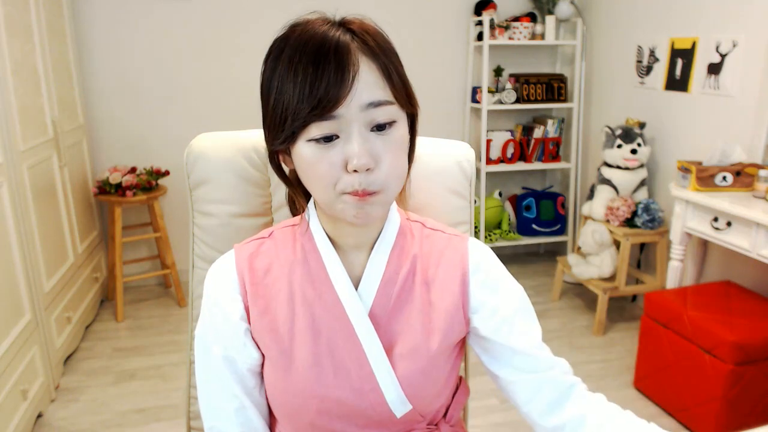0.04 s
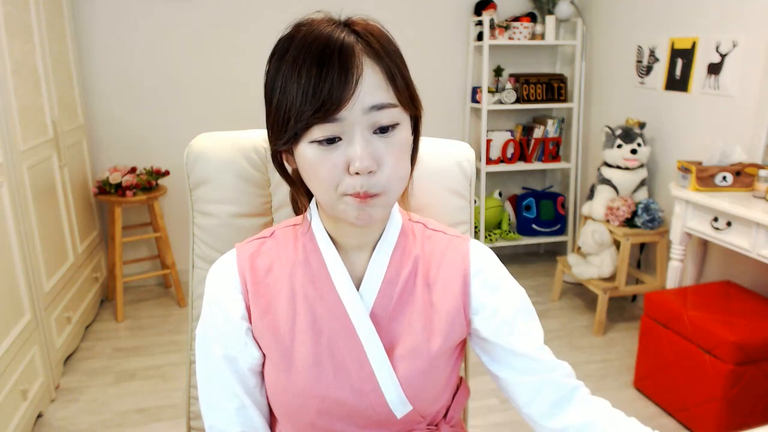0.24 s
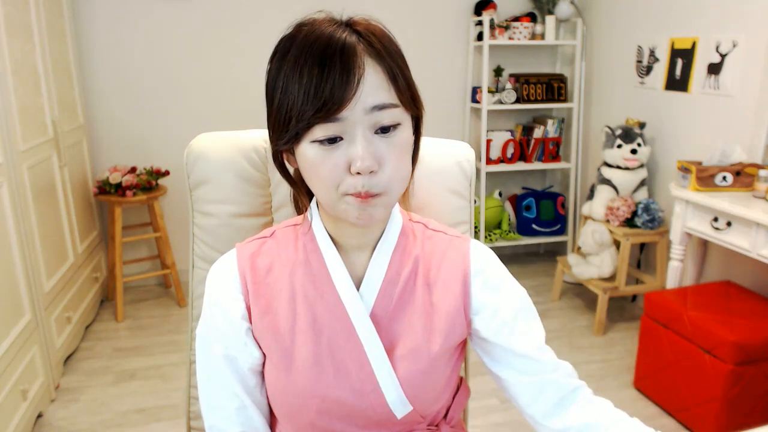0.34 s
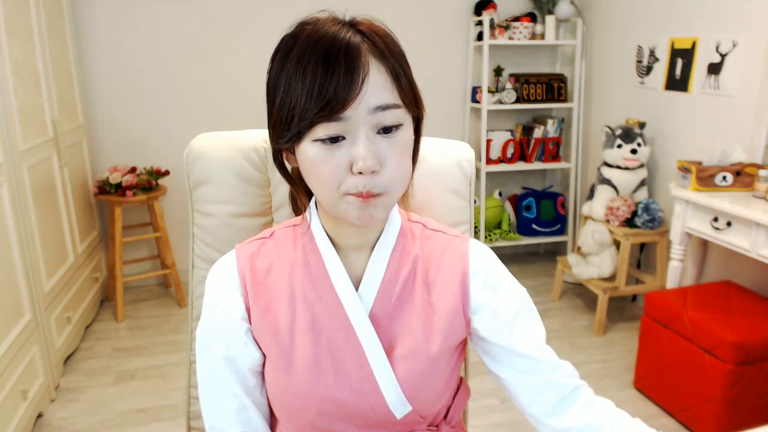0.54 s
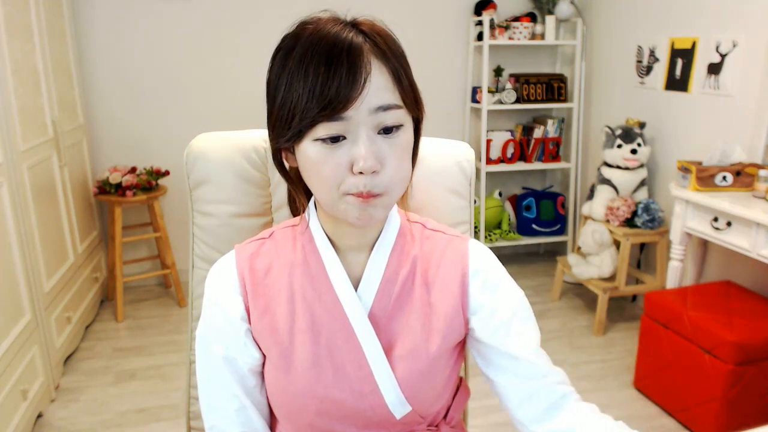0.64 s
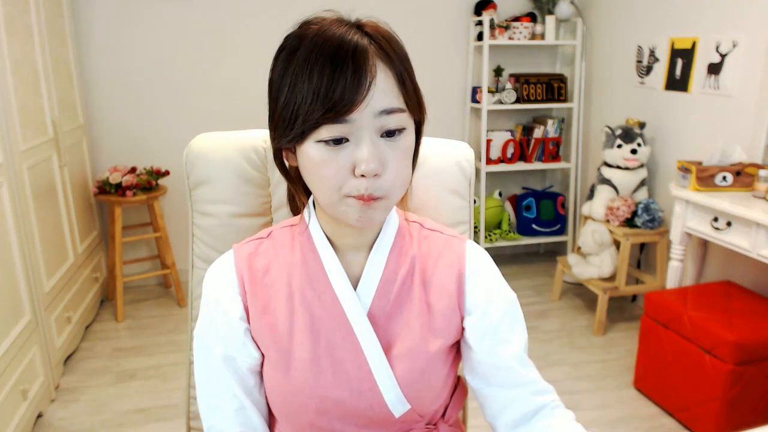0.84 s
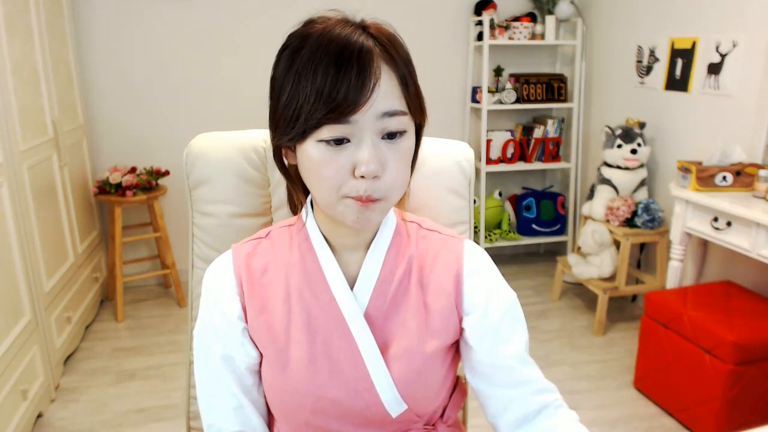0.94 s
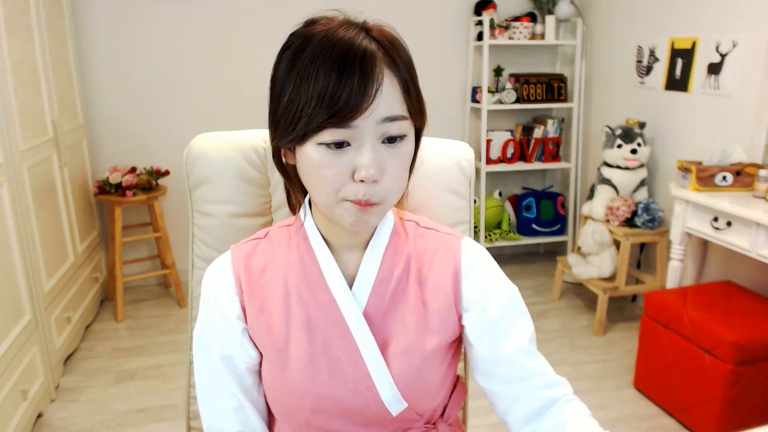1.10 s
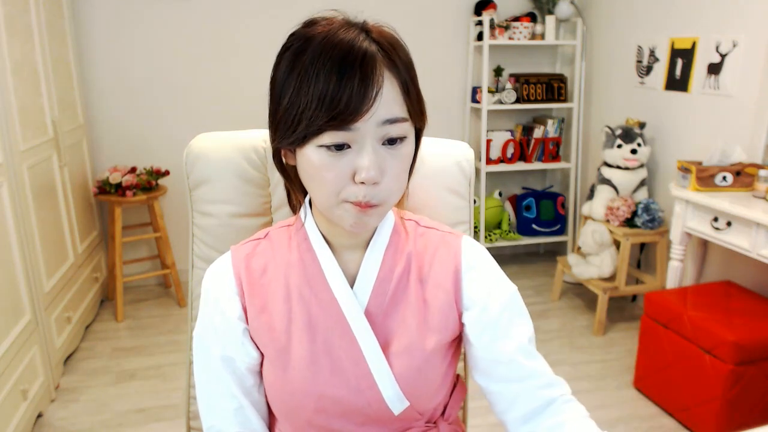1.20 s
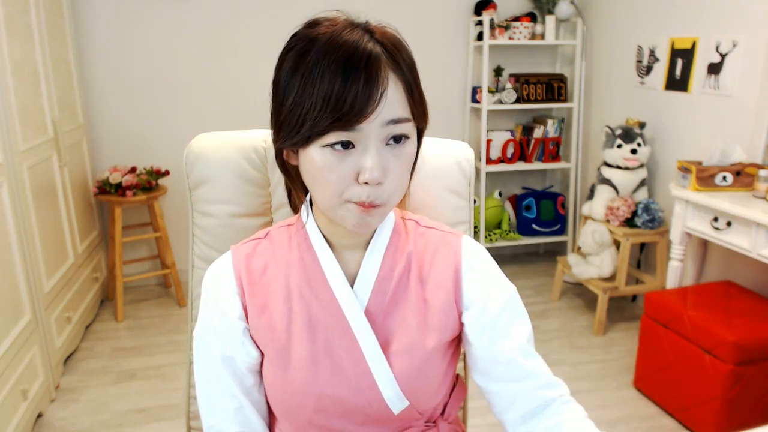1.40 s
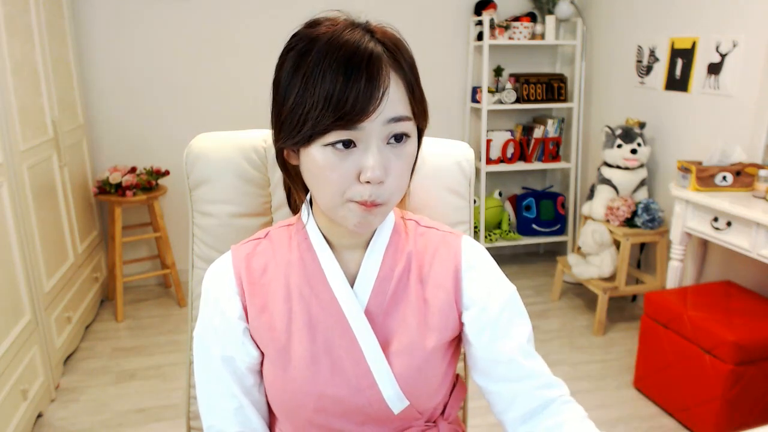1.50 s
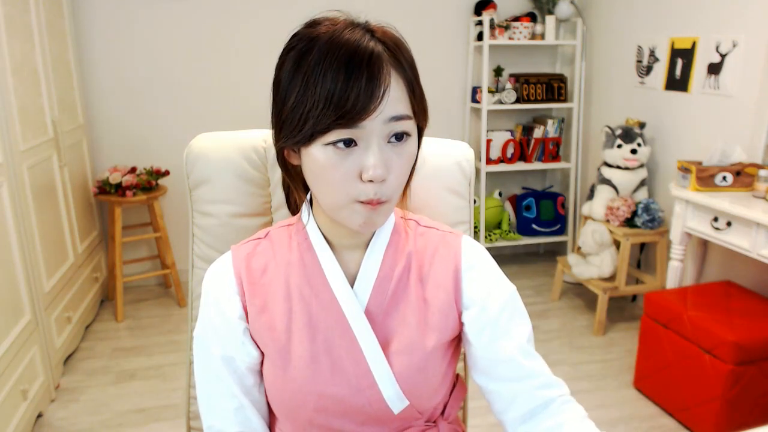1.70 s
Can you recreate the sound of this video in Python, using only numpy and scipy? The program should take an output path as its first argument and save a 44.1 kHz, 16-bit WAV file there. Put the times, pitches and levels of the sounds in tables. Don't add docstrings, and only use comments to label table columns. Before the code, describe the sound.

Close, desk-mounted microphone: a mug is set down twice in quick succession, woody thuds with short rings and low desk heave, then a gentle tap, leaving steady fan hum, soft hiss and very faint sleeve rustle.

```python
import sys
import numpy as np
from scipy import signal
from scipy.fft import rfft, irfft
from scipy.io import wavfile

SR = 44100
rng = np.random.default_rng(int(sys.argv[2]) if len(sys.argv) > 2 else 0)


def boost(x):
    u = np.asarray(x, float) / 20
    return 10 ** u


def wav_out(sig):
    wavfile.write(sys.argv[1], SR, np.round(np.clip(np.atleast_2d(sig).T, -1, 1) * 32767).astype(np.int16))


N = 77175
T = np.arange(N) / SR

# frequency in Hz, width in Hz, level in dB rms.
HUM = [(49.5, 4, -45.5), (93, 1.8, -67), (129.4, 6.3, -52.5), (151.8, 3.5, -48.5), (179.3, 4.2, -52),
       (201.5, 24, -60), (341, 8.1, -62), (581, 10, -71), (915, 13, -71), (1815, 234, -67.5)]
# frequency in Hz, level in dB.
AIR_COLOUR = [(20, -4), (60, -14.5), (90, -12.5), (180, -17), (300, -17), (700, -25.5), (2200, -35),
              (3500, -38)]
# start in seconds, length in seconds, frequency in Hz, level in dB.
SQUEAKS = [
    (.178, .036, 6330, -68),
    (.242, .012, 6330, -65),
    (.515, .025, 9050, -72),
]
# start in seconds, level in dB, contact time in ms,
# signed side of the rocking base (-1 to +1).
FIRST_CONTACTS = [
    (.2166, -31, 0.17, 1),
    (.2173, -11.5, 0.58, 1),
    (.2181, -2, 1.09, -1),
    (.2295, -25, 0.27, -0.17),
    (.2328, -18, 1.2, -1),
    (.2450, -26, 0.35, 1),
    (.2580, -44, 1.5, -1),
    (.2875, -39, 0.48, -1),
    (.343, -29, 2.2, 1),
]
SECOND_CONTACTS = [
    (.4502, -43, 0.14, 0.48),
    (.4518, -23.5, .7, -0.7),
    (.4553, -11.5, 0.46, 0.89),
    (.4605, -29.5, 0.79, 0.61),
    (.4650, -23, .8, -1.05),
    (.4725, -40, 0.36, 0.24),
]
SETTLE_CONTACTS = [
    (.5860, -34, 0.83, 0.47),
    (.5960, -27, 1.26, 0.85),
]
# start in seconds, level in dB, contact time in ms, signed side.
WEIGHT = [
    (.2190, -14, 0.7, -1.62),
    (.4560, -20.5, 1.5, -1.05),
    (.5900, -38.5, 1.7, -1),
]
# frequency in Hz, level in dB, T60 in seconds.
FIRST_MODES = [(288, -11, 0.24), (476, 3.5, 0.05), (500, -3.5, 0.066), (603, -1, 0.13), (629.5, 3.5, 0.2),
               (646, -8.5, .08), (900, -13.5, 0.39), (990, 2.5, 0.071), (1170, -2, 0.081),
               (1290, -11, 0.12)]
SECOND_MODES = [(260, -18, 0.14), (411, 6, 0.12), (582, 9.5, .13), (643, -3.5, .3), (860, -8, 0.2),
                (1103, -15.5, 0.27), (1260, -10, .22), (1455, -13, .2), (1810, -15, .2), (2260, -5.5, .22)]
SETTLE_MODES = [(260, 10.5, 0.21), (599, 4.5, 0.23), (710, 13, 0.076)]
# frequency in Hz, level in dB, T60 in seconds.
THUD = [(366, 14, 0.031), (885, 2, 0.051)]
# frequency in Hz, level in dB, T60 in seconds.
HEAVE = [
    [(35.8, -15, 0.49), (54.8, -5.5, 0.24), (68.2, -2, 0.21), (81.4, -10, 0.1)],
    [(40.6, -3.5, 0.48), (54.6, 4.5, 0.27), (72.3, -4, 0.18), (84, -12, 0.077)],
    [(35, -22, .25), (62, 6.5, 0.41)],
]
# frequency in Hz, density in dB per Hz.
FIRST_TAIL = [(100, -2.5), (400, -14.5), (900, -17), (1500, -23.5), (2400, -33.5), (3500, -43),
              (7000, -46.5), (12000, -59)]
SECOND_TAIL = [(100, -2), (400, -8), (900, -23), (1500, -22), (2500, -31), (3100, -40), (5000, -50),
               (12000, -61)]
# frequency in Hz, T60 in seconds.
TAIL_T60 = [(100, 0.25), (500, 0.34), (2000, .28), (5000, 0.16), (12000, 0.049)]
# frequency in Hz, density in dB per Hz.
CRACK = [(500, -18), (1500, -13), (2600, -6.5), (4000, -17), (8000, -58), (14000, -56)]
# frequency in Hz, level in dB, T60 in seconds.
CLACK = [
    [(1340, 2, 0.021), (1750, -22, 0.09), (2330, 10, 0.018), (3080, -38, .06), (4900, -19, 0.15),
     (7040, -28, 0.056)],
    [(1580, 2, 0.049), (1795, 4.5, 0.022), (2180, -14, 0.044), (3350, -34, .06), (3970, -15, 0.07),
     (4720, -13.5, .05)],
    [(1110, -8, .03)],
]
RING_DB = [-12.5, -15.5, -14]
TAIL_DB = [-16.5, -11, -16]
CRACK_DB = [-29, -38, -42]
CLACK_DB = [-23, -23, -26]
# start in seconds, frequency in Hz, peak level in dB, T60 in seconds.
PANEL_NOTES = [
    (.2200, 351, -25, .37),
    (.2200, 727, -33, .24),
    (.2200, 148, -24, .16),
    (.4560, 350, -31, .6),
    (.4560, 163, -30, .25),
]
# centre in seconds, length in seconds, frequency in Hz, level in dB.
SWAY = [
    (1.11, 0.33, 87, -49),
    (0.555, .1, 56, -33),
]
# centre in seconds, length in seconds, centre frequency in Hz, level in dB.
RUSTLES = [
    (1.178, .045, 1800, -65),
    (1.175, .04, 5000, -66),
    (.99, .07, 4000, -72),
]

RESPONSE_T = T[:SR // 2]


def curve(table, hz):
    table = np.array(table, float)
    return np.interp(np.log(np.maximum(hz, 1)), np.log(table[:, 0]), table[:, 1])


def unit(x):
    return x / np.sqrt(np.mean(x ** 2))


def band(hz, width_hz, size=N):
    f = np.fft.rfftfreq(size, 1 / SR)
    spectrum = rfft(rng.standard_normal(size))
    return unit(irfft(spectrum * np.exp(-.5 * ((f - hz) / width_hz) ** 2), size))


def bell(centre, length):
    return np.exp(-.5 * ((T - centre) / (length / 2)) ** 2)


def push(contacts):
    force = 0
    for start, db, ms, side in contacts:
        pulse = np.exp(-.5 * ((T - start - ms / 1e3) / (ms / 4460.0)) ** 2)
        force = force + side * boost(db) * pulse / (ms * SR / 1e3)
    return force


def rings(modes):
    t = RESPONSE_T
    return sum(boost(db) * np.sin(2 * np.pi * hz * t) * 1000. ** (-t / min(t60, .7)) for hz, db, t60 in modes)


def hear(force, response):
    return signal.fftconvolve(force, response)[:N]


def room():
    steady_share, air_db = .5, -50.5
    hum = 0
    for hz, width_hz, db in HUM:
        share = steady_share * (width_hz < 7)
        tone = np.sqrt(2 * share) * np.sin(2 * np.pi * (hz * T + rng.random()))
        hum = hum + boost(db) * (tone + np.sqrt(1 - share) * band(hz, width_hz))
    f = np.fft.rfftfreq(N, 1 / SR)
    gain = boost(curve(AIR_COLOUR, f)) * (f > 15) / (1 + (f / 5000) ** 2)
    return hum + boost(air_db) * unit(irfft(rfft(rng.standard_normal(N)) * gain, N))


def glaze_squeaks():
    return sum(boost(db) * bell(start + length / 2, length) * np.sin(2 * np.pi * hz * T)
               for start, length, hz, db in SQUEAKS)


def dense_tail(colour, bands):
    t, rise_s = RESPONSE_T, 0.001
    decaying = sum(boost(curve(colour, hz)) * np.sqrt(hz / 400) * noise * 1000. ** (-t / curve(TAIL_T60, hz))
                   for hz, noise in bands)
    return (1 - np.exp(-t / rise_s)) * decaying


def crack_response(bands):
    t60_s = 0.044
    burst = sum(boost(curve(CRACK, hz)) * np.sqrt(hz / 400) * noise[::-1] for hz, noise in bands[8:])
    return burst * 1000. ** (-RESPONSE_T / t60_s)


def contact_damping():
    settled_s, t60_s = 0.564, .08
    return 1000. ** (-np.maximum(T - settled_s, 0) / t60_s)


def panel_notes():
    out = 0
    for start, hz, db, t60 in PANEL_NOTES:
        note = np.pad(rings([(hz, db, t60)]), (0, N - len(RESPONSE_T)))
        out = out + np.roll(note, int(start * SR))
    return out


def mug():
    edge_ms, hard_ms, heave_rise_s = .05, 0.43, 0.0084
    third_octaves = 100 * 2 ** (np.arange(22) / 3)
    bands = [(hz, band(hz, hz / 8, size=SR // 2)) for hz in third_octaves]
    crack = crack_response(bands)
    mute = contact_damping()
    heave_rise = 1 - np.exp(-RESPONSE_T / heave_rise_s)
    landings = [(FIRST_CONTACTS, FIRST_MODES, FIRST_TAIL),
                (SECOND_CONTACTS, SECOND_MODES, SECOND_TAIL),
                (SETTLE_CONTACTS, SETTLE_MODES, SECOND_TAIL)]
    out = -mute * panel_notes()
    for k, (contacts, modes, colour) in enumerate(landings):
        ring = hear(push(contacts), boost(RING_DB[k]) * (rings(modes) + rings(THUD)))
        out = out + (ring if k == 2 else ring * mute)
        out = out + hear(push([WEIGHT[k]]), rings(HEAVE[k]) * heave_rise)
        edges = push([(s, db, edge_ms, side) for s, db, _, side in contacts])
        out = out + hear(edges, boost(TAIL_DB[k]) * dense_tail(colour, bands))
        sharp = push([(s, db - 40 * np.log10(ms / hard_ms), edge_ms, side) for s, db, ms, side in contacts])
        out = out + hear(sharp, boost(CRACK_DB[k]) * crack + boost(CLACK_DB[k]) * rings(CLACK[k]))
    return 2 * out


def desk_sway():
    return sum(boost(db) * bell(centre, length) * np.sin(2 * np.pi * hz * T) for centre, length, hz, db in SWAY)


def sleeve_rustles():
    return sum(boost(db) * bell(centre, length) * band(hz, hz / 2) for centre, length, hz, db in RUSTLES)


def scene():
    return (room() + glaze_squeaks() + mug() + desk_sway() + sleeve_rustles())[None]


def top_cut(x):
    return signal.sosfilt(signal.butter(12, 16430, fs=SR, output="sos"), x)


def record(dry):
    hiss_db, top_hz = -64.5, 15750
    x = dry + boost(hiss_db) * rng.standard_normal(dry.shape)
    x = signal.sosfilt(signal.ellip(10, .2, 80, top_hz, fs=SR, output="sos"), x)
    mix = x / (1 + np.abs(x) ** 6) ** (1 / 6) * 0.96
    return top_cut(mix)


dry = scene()
out = record(dry)
wav_out(out)
```